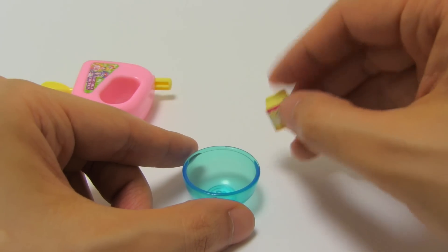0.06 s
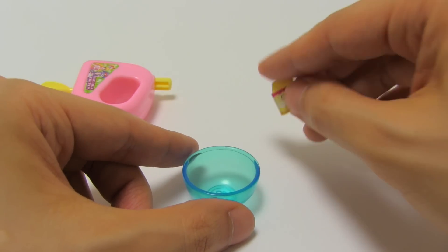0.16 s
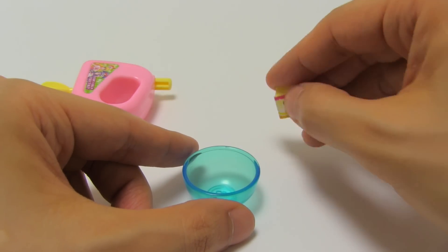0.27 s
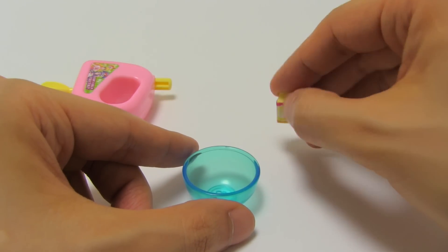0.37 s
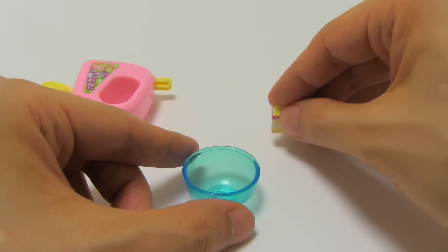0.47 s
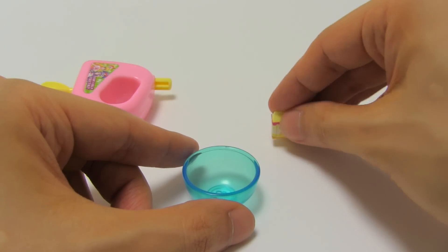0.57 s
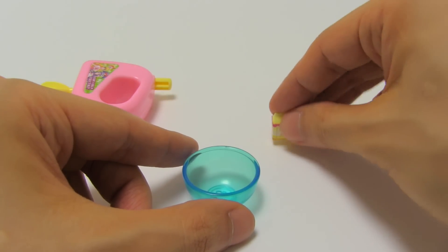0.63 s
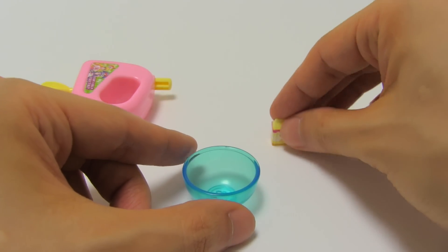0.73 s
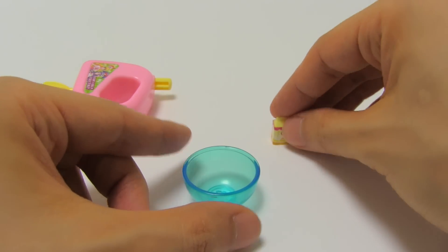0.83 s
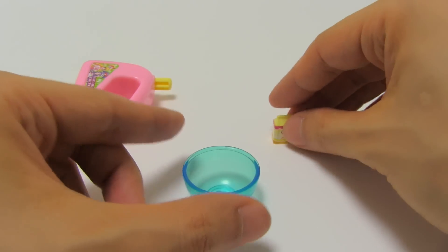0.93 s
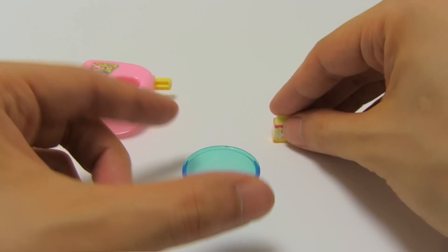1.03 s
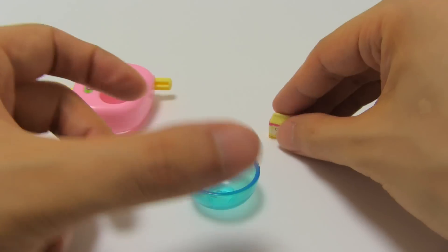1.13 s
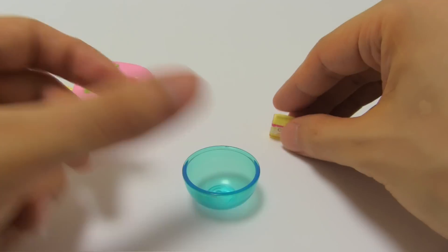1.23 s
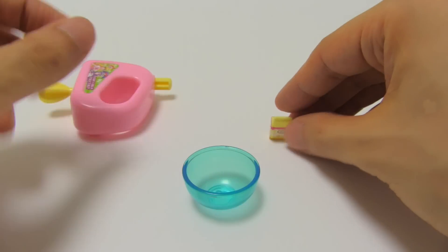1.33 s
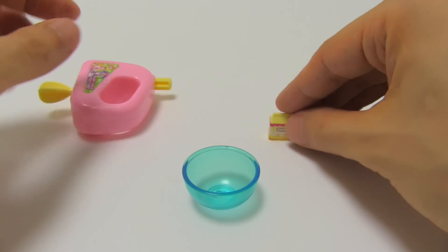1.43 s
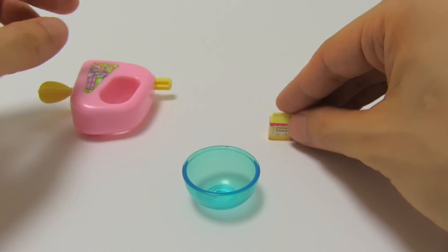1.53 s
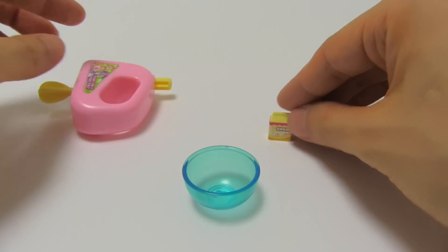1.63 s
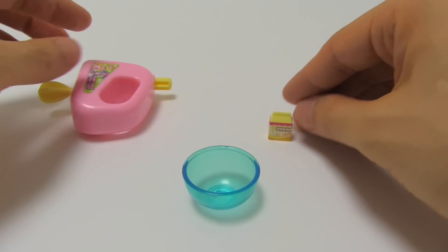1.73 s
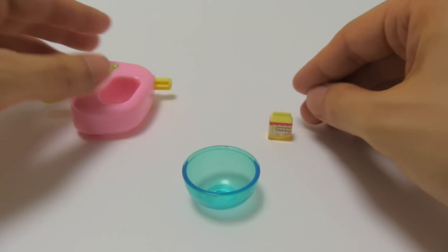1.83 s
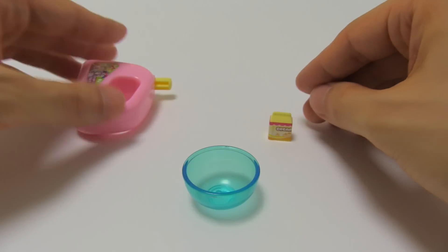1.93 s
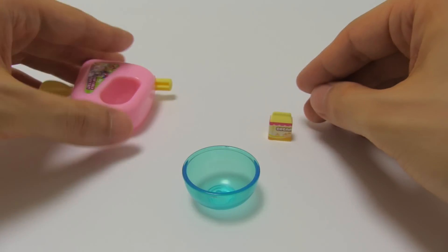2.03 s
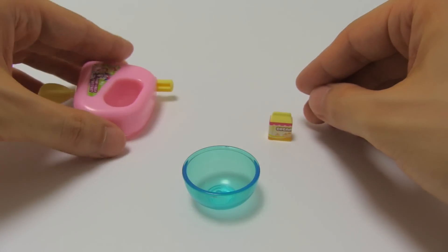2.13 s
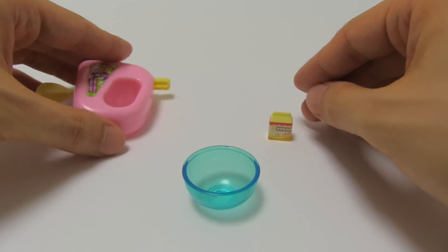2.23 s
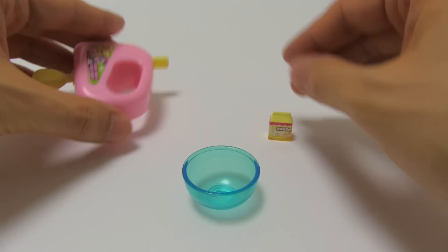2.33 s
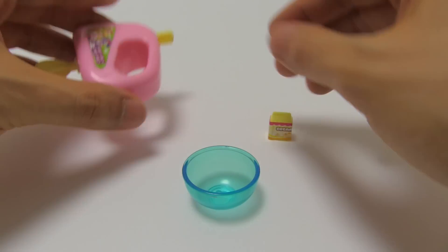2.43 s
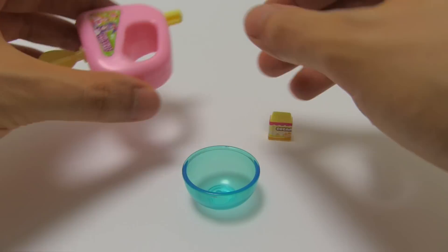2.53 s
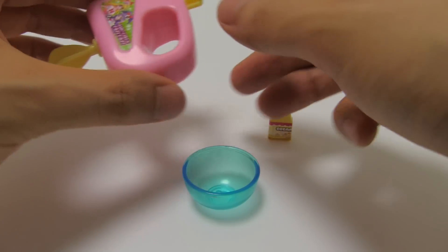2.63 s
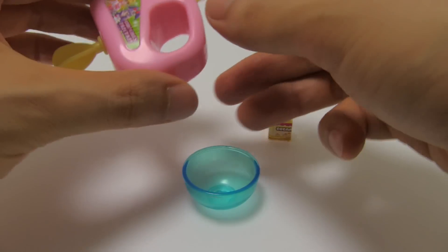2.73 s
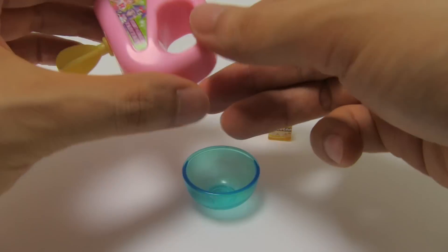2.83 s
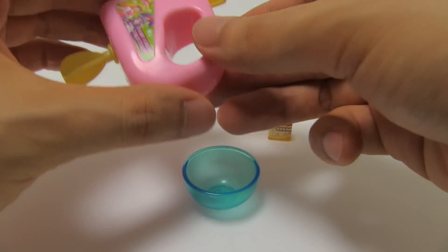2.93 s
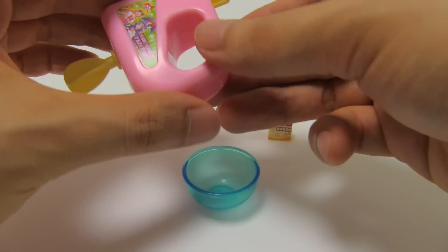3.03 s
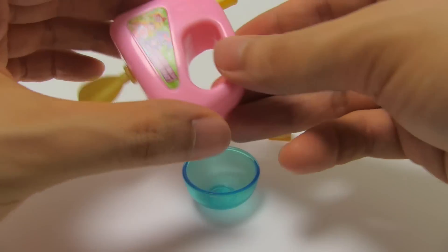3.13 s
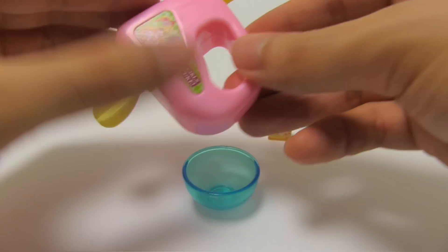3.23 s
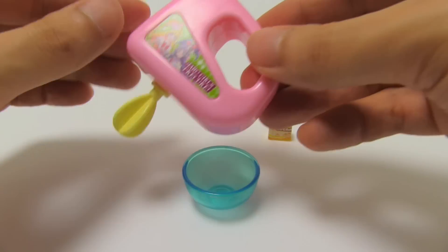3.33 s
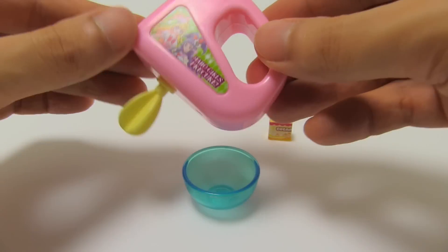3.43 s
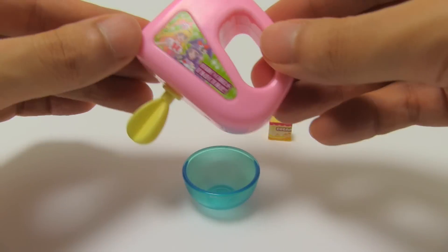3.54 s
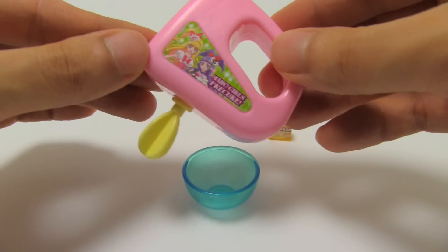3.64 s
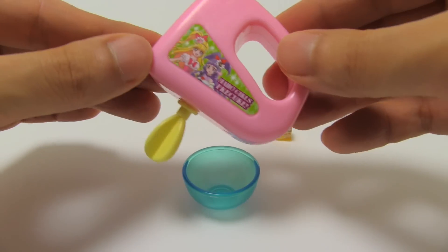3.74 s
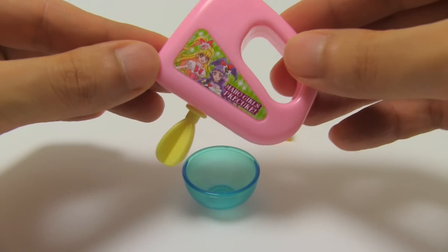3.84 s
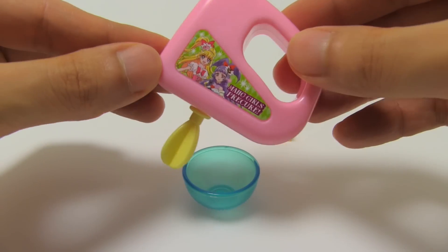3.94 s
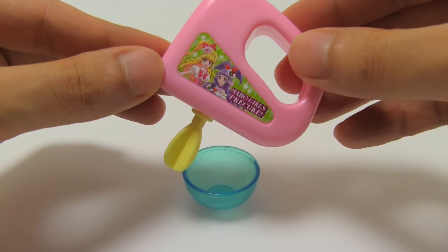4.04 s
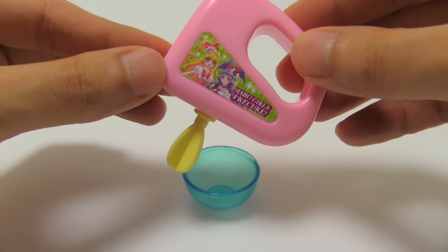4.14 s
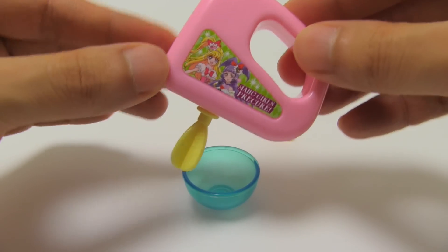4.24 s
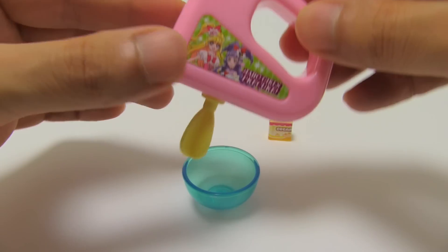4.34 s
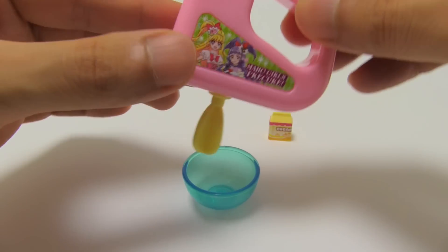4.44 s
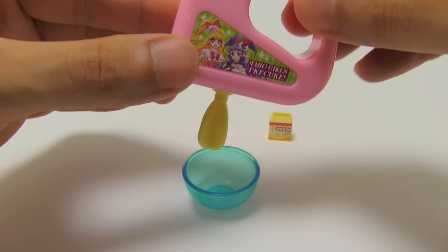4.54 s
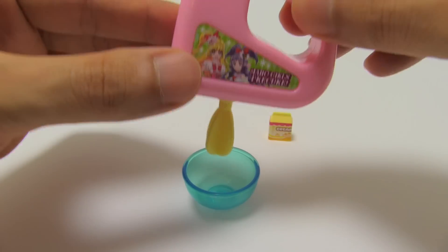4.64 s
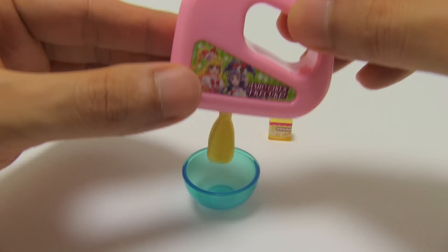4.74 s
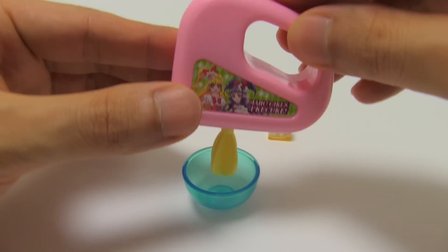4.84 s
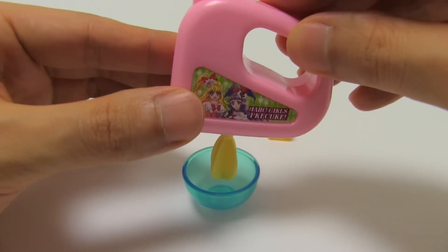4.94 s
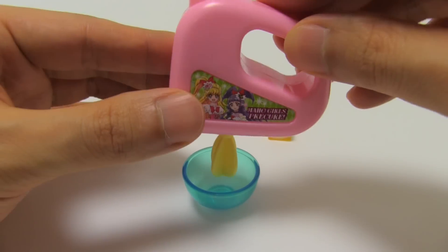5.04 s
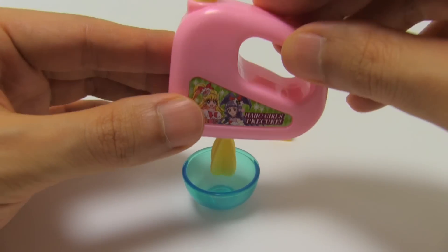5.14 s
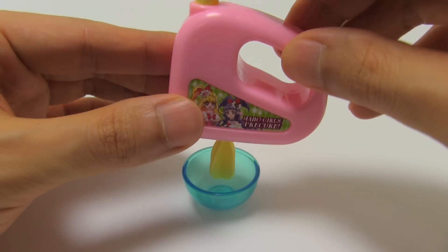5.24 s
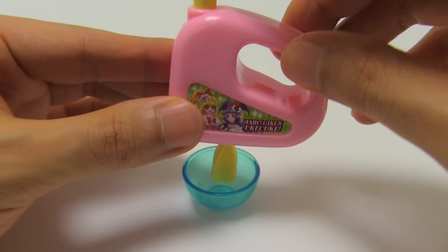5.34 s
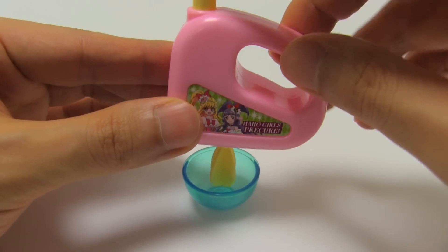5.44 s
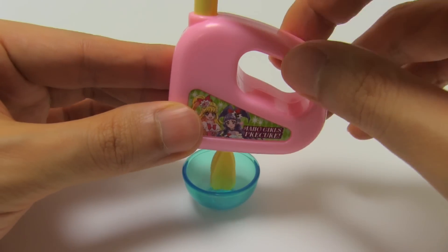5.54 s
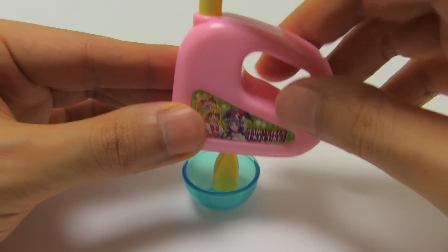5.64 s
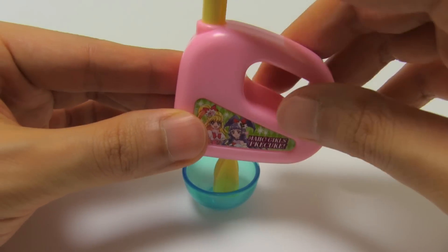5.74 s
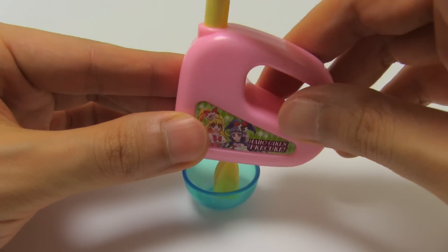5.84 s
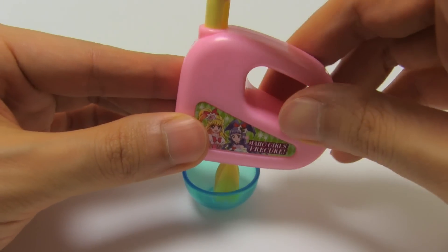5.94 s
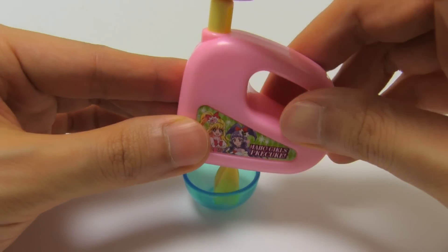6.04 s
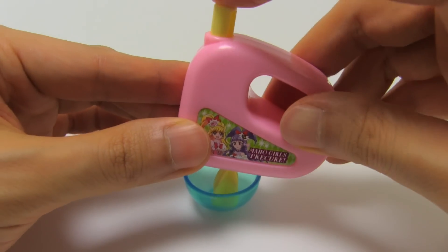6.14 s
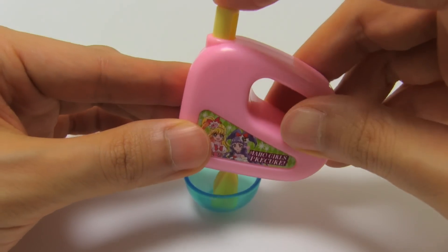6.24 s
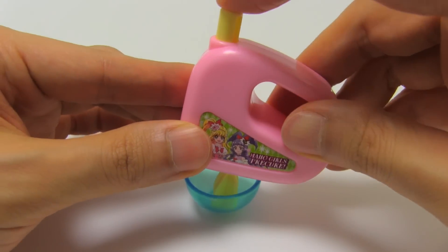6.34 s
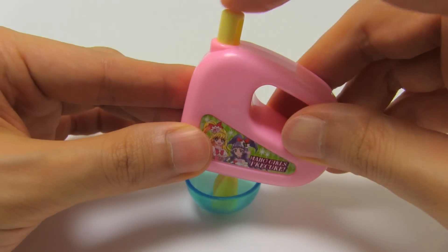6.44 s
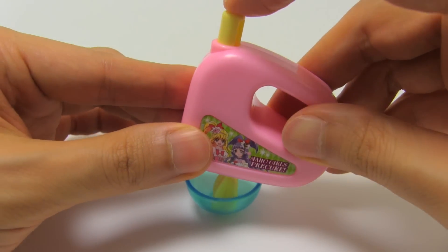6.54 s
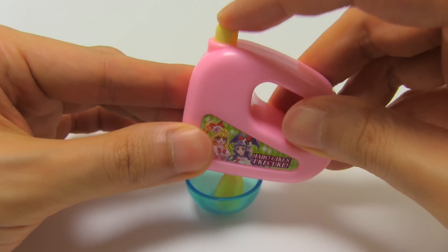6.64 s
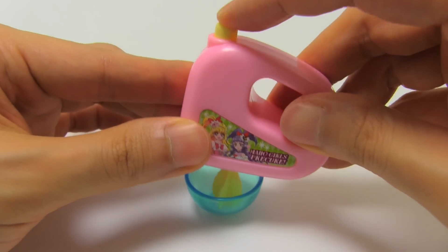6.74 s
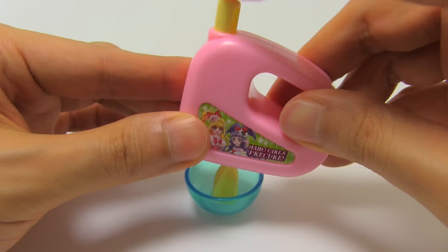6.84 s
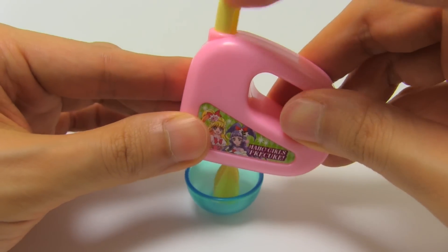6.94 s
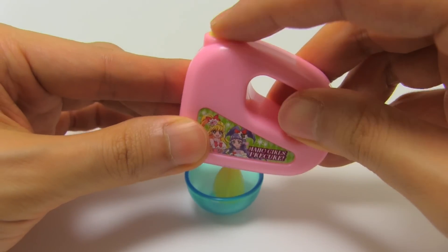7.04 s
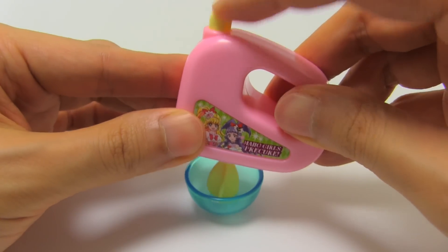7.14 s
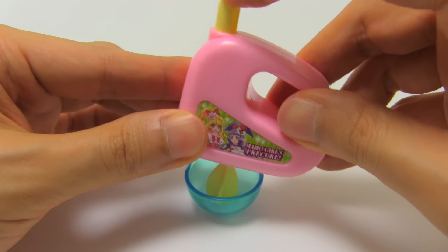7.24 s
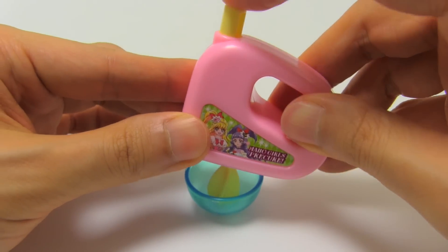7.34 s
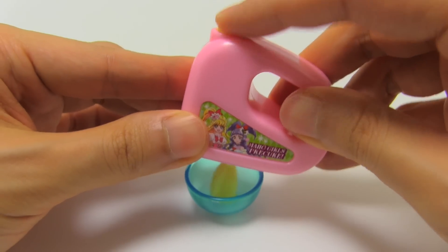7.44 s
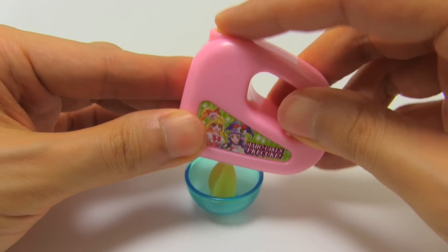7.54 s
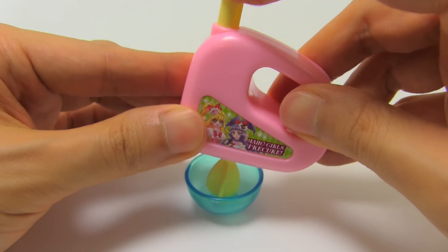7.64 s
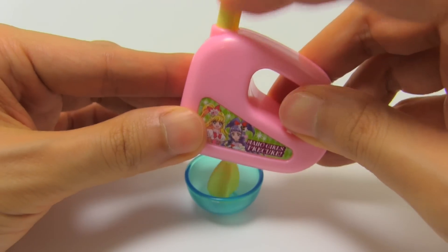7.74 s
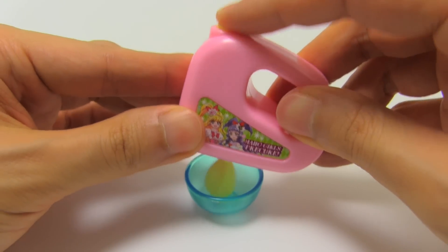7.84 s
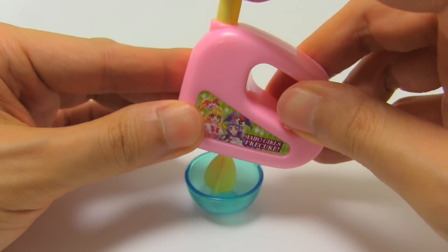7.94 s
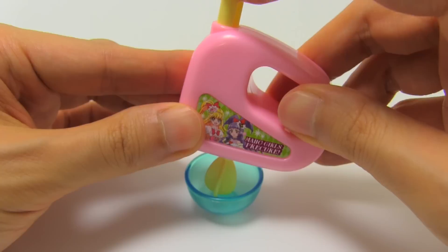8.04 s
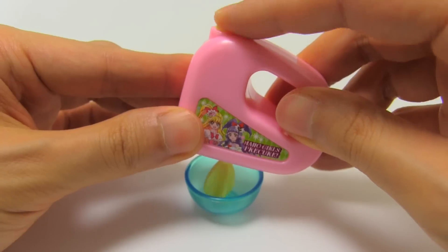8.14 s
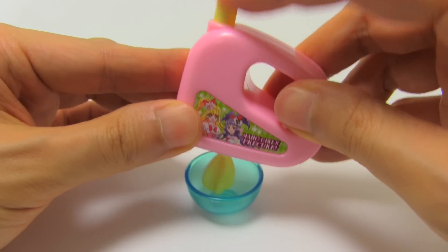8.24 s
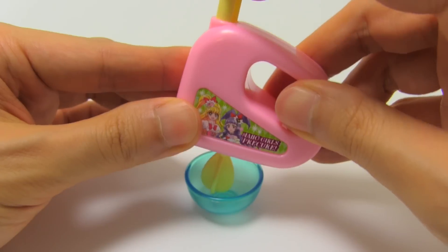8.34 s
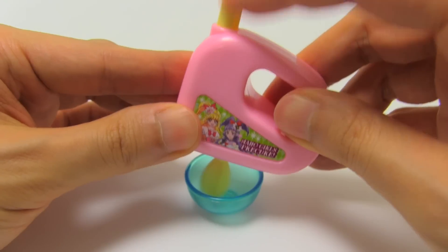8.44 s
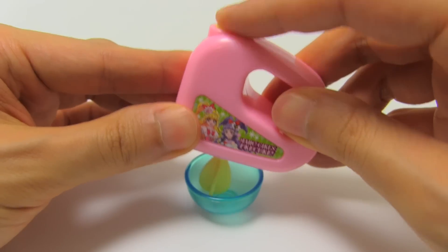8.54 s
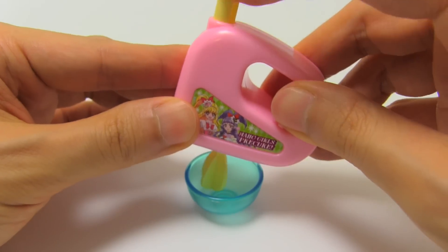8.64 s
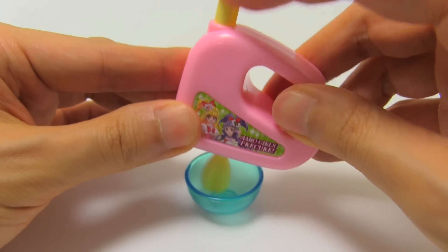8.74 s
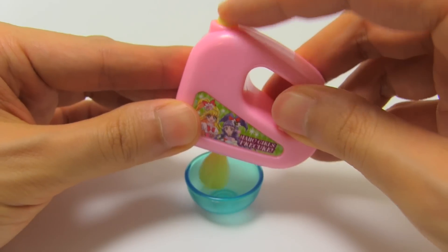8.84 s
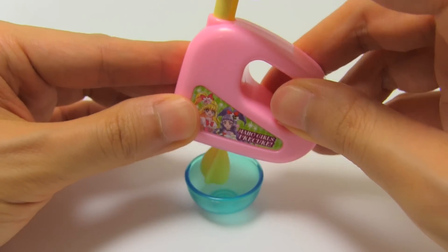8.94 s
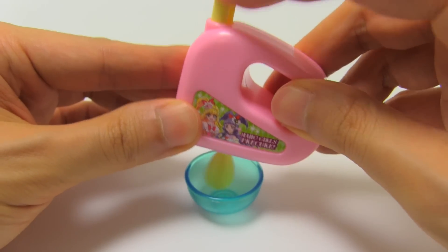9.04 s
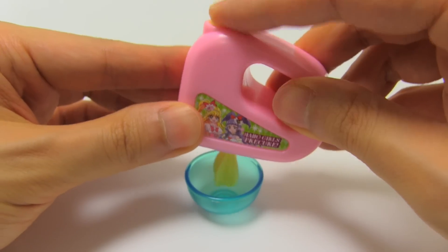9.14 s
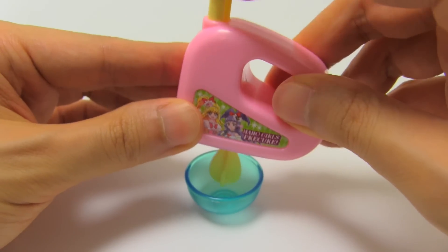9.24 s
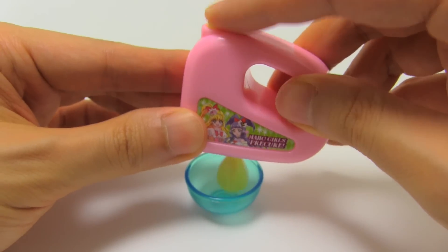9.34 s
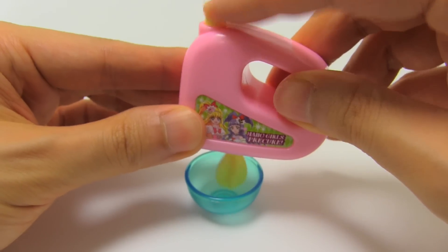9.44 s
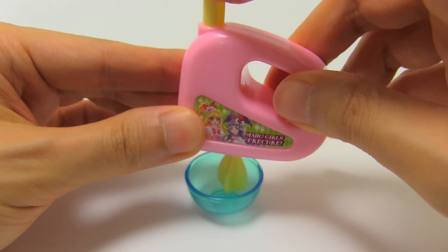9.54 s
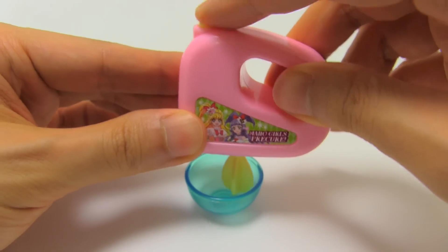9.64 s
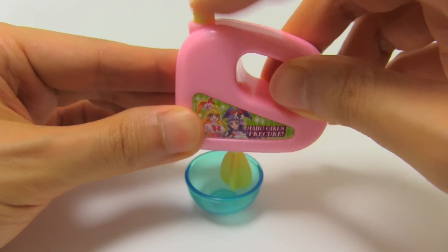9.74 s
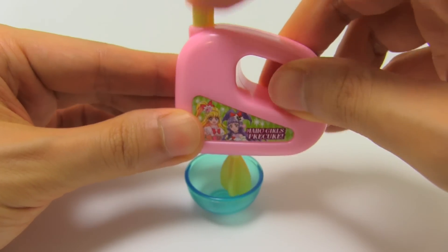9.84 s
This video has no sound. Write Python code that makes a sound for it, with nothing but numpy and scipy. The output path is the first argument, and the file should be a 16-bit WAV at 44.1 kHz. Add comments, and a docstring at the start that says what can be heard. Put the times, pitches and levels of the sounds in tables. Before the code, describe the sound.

Faint taps and plastic ticks from handling, then a toy hand mixer's beater rattles rapidly in a small plastic bowl.

```python
"""A small plastic toy hand mixer on a table, close up in a quiet room with a fan's hum and a faint whine.
First a toy carton knocks down on the table and fingers slide over bowl and carton. The mixer is picked
up, its loose parts ticking as the grip shifts. From about 6.6 s a finger pumps the plunger: on every
push and return the gears chatter and the beater clacks in its plastic bowl, ringing the hollow shell."""
import sys
import numpy as np
from scipy import signal
from scipy.fft import rfft, irfft
from scipy.io import wavfile
from scipy.ndimage import uniform_filter1d, minimum_filter1d

SR = 44100
rng = np.random.default_rng(int(sys.argv[2]) if len(sys.argv) > 2 else 0)


def to_wav(sig):
    """Store sig (one row per channel, or 1-D mono) as 16-bit WAV at the path in sys.argv[1].

    Samples outside -1..1 are clipped; the rate is SR.
    """
    pcm = np.clip(np.atleast_2d(sig), -1, 1) * 32767
    pcm = np.round(pcm).astype(np.int16)
    wavfile.write(sys.argv[1], SR, pcm.T)  # frames by channels


N = 435708
T, HZ = np.arange(N) / SR, np.fft.rfftfreq(N, 1 / SR) + 1
HIT_SIZE, LEAD_S = 4096, .008  # samples in one hit; time before its blow lands
HIT_T, HIT_HZ = np.arange(HIT_SIZE) / SR, np.fft.rfftfreq(HIT_SIZE, 1 / SR) + 1
SIDES = np.array([[1], [-1]])  # polarity of the side signal, left and right

# pushes and returns of the plunger: start_s, length_s, effort_db, treble_over_body_db,
# slack_before_start_s, slam_after_start_s, slam_over_effort_db
STROKES = [(6.65, 0.055, -23, -4.5, .023, 0.021, 8.5), (6.809, .052, -16.5, 3, 0, 0.0064, 4.5),
           (6.996, 0.093, -16.5, 0, 0.0052, 0.028, 8), (7.176, 0.083, -18.5, 2, 0.0097, 0.01, 7.5),
           (7.422, 0.063, -12.5, 2.5, .013, 0.0023, 3), (7.589, 0.073, -17.5, -2.5, 0.00015, 0.016, 18.5),
           (7.782, 0.037, -12.5, 4.5, 0.017, 0.021, 4.5), (7.933, 0.032, -13.5, -0.5, .008, 0.0029, 10),
           (8.122, 0.05, -11.5, 2.5, 0.0064, 0.034, 11), (8.256, .06, -16, 1.5, .009, 0.043, 7),
           (8.484, .032, -11, 4.5, .014, 0.012, 7.5), (8.631, 0.064, -16, 4, 0.01, 0.025, 9.5),
           (8.779, 0.042, -16, -2, 0.0032, 0.02, 5.5), (8.922, 0.031, -13, 1, 0.016, 0.0002, 5.5),
           (9.085, 0.041, -14, 2, .025, 0, 5), (9.215, 0.047, -12, 3.5, 0.0079, 0.0088, 7.5),
           (9.362, .03, -11, 2.5, .024, .008, 3.5), (9.492, .036, -12, 3.5, 0.0062, 0.0099, 11),
           (9.65, 0.026, -17, -5, 0.023, 0.012, 9.5), (9.789, .051, -14, -3, .017, 0.0022, 3.5)]


def undb(db):
    """Decibels to gain."""
    return 10 ** (np.asarray(db) / 20)


def unit(x):
    """Scale to rms 1."""
    return x / np.sqrt(np.mean(x ** 2))


def colour(points, hz):
    """Read (Hz, value) points on a log-frequency axis."""
    f, value = np.transpose(points)
    return np.interp(np.log(hz), np.log(f), value)


def causal(db):
    """Minimum-phase response with this gain: it rings only after the blow."""
    cepstrum = irfft(np.log(undb(db)))
    cepstrum[1:HIT_SIZE // 2] *= 2
    cepstrum[HIT_SIZE // 2 + 1:] = 0
    return np.exp(rfft(cepstrum))


def at_level(hit, db):
    """Scale a hit so that its loudest moment has this rms level."""
    return hit * undb(db) / np.sqrt(uniform_filter1d(hit ** 2, size=64).max())


def add(track, s, sound):
    """Mix a hit into the track so that its blow lands at time s."""
    start = int((s - LEAD_S) * SR)
    track[start:start + len(sound)] += sound[:N - start]


def noise(gain):
    """A bed of noise with this spectral shape, at rms 1."""
    return unit(irfft(rfft(rng.standard_normal(N)) * gain, N))


def room_tone(air_db=-52.5, side_db=-10, whine_trim_db=-2):
    """Steady air noise with a fan's wavering hum and a faint electrical whine."""
    # colour of the room's air: frequency_hz, relative_density_db
    air_eq = [(30, -23), (75, -6.5), (110, -10), (160, -4.5), (260, -2.5), (440, -10.5), (900, -12),
              (1300, -21.5), (2200, -27), (3300, -30), (5700, -30.5), (8500, -28), (11000, -32),
              (15500, -36.5)]
    # bands of fan hum: pitch_hz, width_hz, level_db
    fan_bands = [(143.1, 3.9, -62.5), (222.4, 6.9, -61.5), (287.8, 5.7, -64), (315.8, 17, -65.5),
                 (502.2, 10, -68.5)]
    # electrical tones: pitch_hz, level_before_trim_db
    whine_tones = [(6541, -80), (7870, -94), (8710, -97), (8866, -83), (10433, -104), (12037, -96)]
    mid_side = np.array([undb(air_db) * noise(undb(colour(air_eq, HZ))) for _ in range(2)])
    for hz, width, db in fan_bands:
        resonance = 1 / (1 + (2 * (HZ - hz) / width) ** 2)
        mid_side += undb(db) * np.array([noise(resonance), noise(resonance)])
    whine = sum(undb(db + whine_trim_db) * unit(np.sin(2 * np.pi * hz * T)) for hz, db in whine_tones)
    mid, side = mid_side
    return mid + whine + undb(side_db) * side * SIDES


def contact(rise_s, t60, buzz_db, buzz_t60, scrape_db, grit_db, scrape_s=0.0032):
    """Spectrum of one contact: the parts scrape, meet in a gritty crack, and buzz as they settle."""
    before, after = np.maximum(LEAD_S - HIT_T, 0), np.maximum(HIT_T - LEAD_S, 0)
    approach = np.exp(-before / rise_s) + undb(scrape_db) * np.exp(-before / scrape_s)
    fade = undb(-60 * after / t60) + undb(buzz_db - 60 * after / buzz_t60)
    hiss, grit = rng.standard_normal((2, HIT_SIZE))
    return rfft(hiss * undb(grit_db * grit) * approach * fade)  # a few tiny contacts stand out


def ring(hz, t60):
    """One mode, struck after LEAD_S."""
    after = np.maximum(HIT_T - LEAD_S, 0)
    return np.sin(2 * np.pi * hz * after) * undb(-60 * after / t60) * (1 - np.exp(-2 * hz * after))


def cluster(hz, t60, spread=0.0546, count=10):
    """Close modes of an irregular plastic part: a clack with a pitch rather than a ping."""
    modes = rng.standard_normal((count, 2))
    return sum(ring(hz * (1 + spread * shift), t60) * size for shift, size in modes) / np.sqrt(count)


def knocks():
    """Blows on the table top: soft contacts are dull, heavy ones give a hollow thump."""
    # things meeting the table: start_s, level_db, corner_hz, thump_db, ring_hz, ring_over_knock_db
    blows = [(0.757, -35.5, 8100, -34, 3600, -11), (0.928, -42.5, 1200, -36, 1500, -24),
             (0.957, -45, 1000, -47, 1500, -20), (1.2055, -34, 7000, -63, 813, -3.5),
             (1.346, -26, 10000, -30, 870, -7), (1.6145, -36.5, 5500, -35.5, 2980, -20),
             (2.1073, -42, 1300, -26, 593, -17), (2.2734, -33, 2200, -23.5, 547, -1.5)]
    # colour of the table top: frequency_hz, gain_db
    table_eq = [(60, -22), (150, -20), (280, -3.5), (500, 1.5), (820, 0.5), (1350, -11.5), (1800, -7),
                (2400, -12), (3200, -6), (5000, -11.5), (9000, -20), (15000, -29)]
    out, table = np.zeros(N), causal(colour(table_eq, HIT_HZ))
    for s, db, corner_hz, thump_db, ring_hz, ring_db in blows:
        force = contact(rise_s=.00024, t60=.0037, buzz_db=-13.5, buzz_t60=.069, scrape_db=-20, grit_db=2)
        softness = 1 / (1 + 1j * HIT_HZ / corner_hz) ** 2
        blow = at_level(irfft(force * table * softness), db)
        thump = undb(thump_db) * ring(hz=354, t60=0.046)
        ringing = at_level(cluster(ring_hz, t60=0.026), db + ring_db)
        add(out, s, blow + thump + ringing)
    return out


def finger_rub(grain_db=3):
    """Skin slips over plastic in small uneven steps."""
    # fingers sliding off the bowl and along the carton: time_s, level_db
    slide = [(.88, -74), (.94, -67), (1.0, -68), (1.06, -49.5), (1.11, -56.5), (1.17, -57), (1.3, -62)]
    # colour of skin on plastic: frequency_hz, relative_density_db
    skin_eq = [(100, -12), (380, -0.5), (700, -14), (1800, -25), (3600, -17.5), (7000, -26), (15000, -32)]
    slips = unit(uniform_filter1d(rng.standard_normal(N), size=300))
    hiss = noise(undb(colour(skin_eq, HZ)))
    envelope_db = np.interp(T, *np.transpose(slide), left=-np.inf, right=-np.inf)
    return hiss * undb(envelope_db + grain_db * slips)


def plastic(spectrum, db, treble_db, split_hz=5700):
    """A click of the shell, its treble set against its body; harder edges favour the treble."""
    click = irfft(spectrum)
    body, treble = (signal.sosfilt(signal.butter(4, split_hz, kind, fs=SR, output="sos"), click)
                    for kind in ("low", "high"))
    return at_level(unit(body) + undb(treble_db) * unit(treble), db)


def loose_parts():
    """Loose parts tick as the toy is handled; each sets one part ringing briefly."""
    # distinct ticks: start_s, level_db, treble_over_body_db, ring_hz, ring_over_tick_db
    ticks = [(1.08, -45, -8, 6400, -3.5), (1.208, -47.5, 0, 3620, 6.5), (1.3446, -31.5, 17, 4900, -10),
             (1.438, -46, -13, 3750, -7), (2.1133, -35, 0, 3660, 1), (2.207, -40.5, -1, 4000, -8),
             (2.2838, -39.5, -11, 3960, 2), (2.292, -43, -9, 3960, 5), (2.315, -32.5, 7, 3850, -6),
             (2.382, -37.5, 1, 4500, -12), (2.445, -46, -7, 9700, -5), (3.34, -42, 5, 4500, -14),
             (3.3678, -39, 0, 4500, -22), (4.633, -47.5, 9, 5250, -7), (4.75, -39, 2, 5250, -2),
             (4.8881, -35.5, -8, 5250, 0.5), (5.2005, -48.5, -6, 4100, -9), (5.437, -37.5, -5, 5250, -1.5),
             (5.5562, -40, 1, 4300, -19), (5.627, -33.5, 8, 4370, -3.5), (5.721, -30.5, 7, 6370, -1),
             (5.8283, -30, 8, 5750, -13), (5.9852, -41.5, -5, 5300, -25), (6.004, -44, -27, 3900, -14),
             (6.5127, -45, -21, 2320, -6), (6.591, -32, -24, 2290, -4)]
    # colour of a light tick on the casing: frequency_hz, gain_db
    casing_eq = [(150, -17), (600, -15), (1500, -6.5), (2600, -7.5), (3300, -6), (3900, 6.5), (4500, 2.5),
                 (5400, -3), (6500, -2), (8000, -5.5), (10000, -3.5), (11500, -9), (15700, -27)]
    out, casing = np.zeros(N), causal(colour(casing_eq, HIT_HZ))
    for s, db, treble_db, ring_hz, ring_db in ticks + grip_ticks():
        force = contact(rise_s=.00016, t60=.0089, buzz_db=-13, buzz_t60=.054, scrape_db=-23, grit_db=3.5)
        ringing = at_level(cluster(ring_hz, t60=0.022), db + ring_db)
        add(out, s, plastic(force * casing, db, treble_db) + ringing)
    return out


def grip_ticks(count=4, scatter_db=3.5, ring_hz=3770, ring_db=-7):
    """Cues for a few fainter ticks, scattered at random through each shift of the grip."""
    # shifts of the grip: start_s, end_s, level_db, treble_over_body_db
    shifts = [(2.126, 2.21, -51, -2), (2.285, 2.335, -46, -12), (3.341, 3.378, -46.5, -3),
              (6.152, 6.501, -52.5, -9)]
    ticks = []
    for start, end, db, treble_db in shifts:
        for k in range(count):
            s = start + (end - start) * (k + rng.random()) / count
            ticks.append((s, db + scatter_db * rng.standard_normal(), treble_db, ring_hz, ring_db))
    return ticks


def shell_response(detune=0.015, change_db=1.5, spot_db=3, spot_points=36):
    """The hollow toy: a broad colour with resonances that shift with the grip and the point struck."""
    # broad colour of the plastic shell: frequency_hz, gain_db
    shell_eq = [(50, -34), (150, -35), (400, -27), (700, -18.5), (1900, -17), (3100, -14.5), (3750, -2.5),
                (4400, -4.5), (5500, -9), (6800, -1), (8800, -4), (10000, -5), (10900, -9.5), (13000, -10),
                (15700, -20)]
    # resonances of shell, beater and bowl: pitch_hz, width_hz, lift_db
    modes = [(2340, 71, 6), (2843, 210, 8.5), (3870, 610, 8.5), (4300, 140, 8), (4615, 190, 4),
             (5250, 80, 7.5), (6446, 370, 4.5), (6830, 100, 3.5), (8220, 180, 2), (9780, 610, 8)]
    gain_db = colour(shell_eq, HIT_HZ)
    for (hz, width, db), (shift, size) in zip(modes, rng.standard_normal((len(modes), 2))):
        centre_hz = hz * (1 + detune * shift)
        gain_db += (db + change_db * size) / (1 + (2 * (HIT_HZ - centre_hz) / width) ** 2)
    # each spot lies on the nodes of some of the many weaker modes and on the crests of others
    spot = np.interp(HIT_HZ, np.linspace(0, SR / 2, spot_points), rng.standard_normal(spot_points))
    return causal(gain_db + spot_db * spot)


def clack(db, treble_db):
    """One hard blow of gears or beater, each time on a new spot."""
    force = contact(rise_s=.00048, t60=.0085, buzz_db=-5, buzz_t60=.028, scrape_db=-20, grit_db=1)
    return plastic(force * shell_response(), db, treble_db)


def clack_run(length_s, slam_s, count=14, gap_s=.0085, jitter=.3, scatter_db=4):
    """Cues (after_s, over_effort_db, heard) for clacks whose force builds to the slam, then ebbs."""
    swell_db_per_s, fade_db_per_s = 84, 97
    timing, strength = rng.standard_normal((count, 2)).T
    gaps = gap_s * np.exp(jitter * timing)
    after = np.cumsum(gaps) - gaps[0]
    drop_db = np.maximum(swell_db_per_s * (slam_s - after), fade_db_per_s * (after - slam_s))
    heard = (after < length_s) & (abs(after - slam_s) > gap_s / 2)  # leave space for the slam
    return zip(after, scatter_db * strength - drop_db, heard)


def rattle(treble_per_db=.5):
    """Each stroke clatters around one hard slam, harder clacks brighter; the beater rebounds between."""
    # the beater swinging loose against the bowl: start_s, level_db, treble_over_body_db
    rebounds = [(6.7271, -25.5, -4), (7.1142, -29.5, 2), (7.2519, -15, -4.5), (7.8445, -15, -7),
                (7.9073, -26, -4), (7.997, -25.5, 2), (8.1956, -18.5, -2), (8.54, -21.5, 9),
                (8.973, -21.5, 1), (8.9907, -25.5, 2), (9.049, -28, 0), (9.277, -12, -1), (9.407, -15.5, 4)]
    out = np.zeros(N)
    for start, length, effort_db, treble_db, slack, slam, slam_db in STROKES:
        add(out, start - slack, clack(db=-21.5, treble_db=-4))  # a dull click takes up the slack
        for after, db, heard in [(slam, slam_db, True), *clack_run(length, slam)]:
            sound = clack(effort_db + db, treble_db + treble_per_db * db)
            if heard:
                add(out, start + after, sound)
    for s, db, treble_db in rebounds:
        add(out, s, clack(db, treble_db))
    return out


def gears(teeth_hz=420, scatter_db=3, chatter_db=-11.5, run_up_s=.005, run_up_db=-16):
    """Teeth tick past each other unevenly while the plunger moves, softly as it takes up the slack."""
    out = np.zeros(N)
    for start, length, effort_db, *_ in STROKES:
        shell = shell_response()
        times = start - run_up_s + np.cumsum(rng.uniform(.5, 1.5, size=56)) / teeth_hz
        slack = np.maximum(start - times, 0) / run_up_s
        levels = effort_db + chatter_db + run_up_db * slack + scatter_db * rng.standard_normal(len(times))
        for s, tooth_db in zip(times, levels):
            force = contact(rise_s=.00095, t60=.016, buzz_db=-14, buzz_t60=.036,
                            scrape_db=-18, grit_db=2.5)
            if s < start + length:
                add(out, s, plastic(force * shell, tooth_db, treble_db=0))
    return out


def room(dry, build_s=0.0029):
    """A small room: a diffuse tail, shorter and narrower up top, that changes as hands and toy move."""
    # reflections: frequency_hz, level_db, t60_s, side_over_mid_db
    reflections = [(200, -4.5, 0.38, -6), (1300, -8.5, 0.35, -4.5), (4500, -13, 0.34, -12),
                   (8700, -15.5, 0.27, -19.5), (15000, -18.5, 0.2, -40)]
    # what the toy radiates sideways, against what it sends to the microphone: frequency_hz, gain_db
    send_eq = [(2000, 1), (3400, 2), (4250, -1.5), (4750, 4), (5400, 6), (6000, -0.5), (7000, -2.5),
               (8000, 3), (9700, -0.5), (11300, 0), (13000, 2.5)]
    size, hop = 2 ** 14, 2 ** 12
    centres = np.geomspace(100, 16000, num=12)[:, None]
    points_hz, *columns = np.transpose(reflections)
    db, t60, side_db = (np.interp(np.log(centres), np.log(points_hz), c) for c in columns)
    hz = np.fft.rfftfreq(size, 1 / SR) + 1
    nearest_band = np.argmin(abs(np.log(hz / centres)), axis=0)
    bands = nearest_band == np.arange(len(centres))[:, None]
    fades = undb(-60 * T[:size] / t60) * (1 - np.exp(-(T[:size] / build_s) ** 2))
    fades = fades / np.linalg.norm(fades, axis=1, keepdims=True) * undb([db, db + side_db])  # mid, side
    wet = np.zeros((2, N + size + 2 * hop))
    send = irfft(rfft(dry) * undb(colour(send_eq, HZ)), N)
    padded, window = np.pad(send, (0, 2 * hop)), signal.windows.cosine(2 * hop)
    for start in range(0, N, hop):  # a fresh tail for each overlapping slice
        band_noise = irfft(rfft(rng.standard_normal((2, 1, size))) * bands)
        tail = (band_noise * fades).sum(axis=1)
        echo = signal.fftconvolve((padded[start:start + 2 * hop] * window)[None], tail, axes=1)
        wet[:, start:start + echo.shape[1]] += echo
    return dry + wet[0, :N] + wet[1, :N] * SIDES


def scene():
    """The toy sits straight ahead of the microphone, over a bed of room tone."""
    return room(rattle() + gears() + loose_parts() + knocks() + finger_rub()) + room_tone()


def record(dry, top_hz=15750):
    """A fast limiter holds down the hardest clacks; a steep low-pass cuts the top."""
    gain = 1 / np.maximum(abs(dry).max(axis=0), 1)
    gain = uniform_filter1d(minimum_filter1d(gain, size=89), size=89)
    return signal.sosfilt(signal.ellip(10, .2, 70, top_hz, fs=SR, output="sos"), dry * gain)


dry = scene()
out = record(dry)
to_wav(out)
```